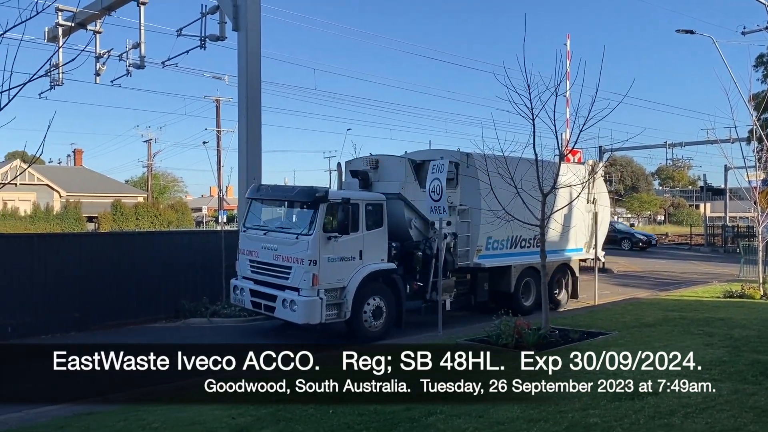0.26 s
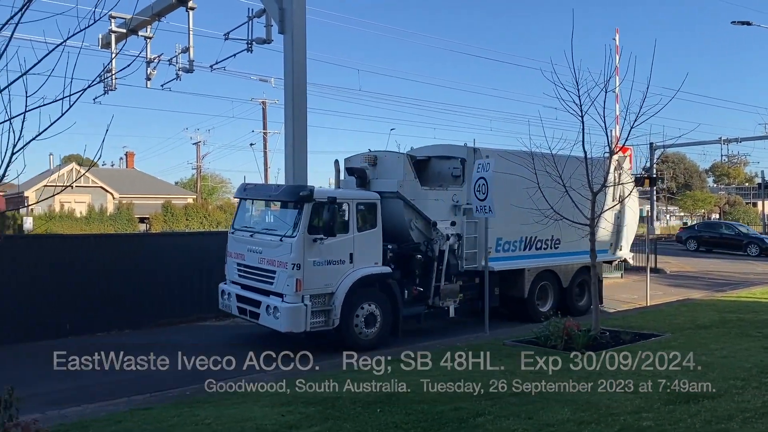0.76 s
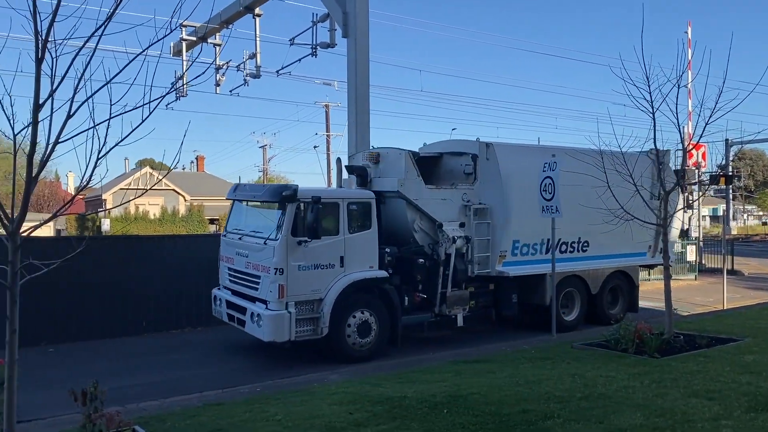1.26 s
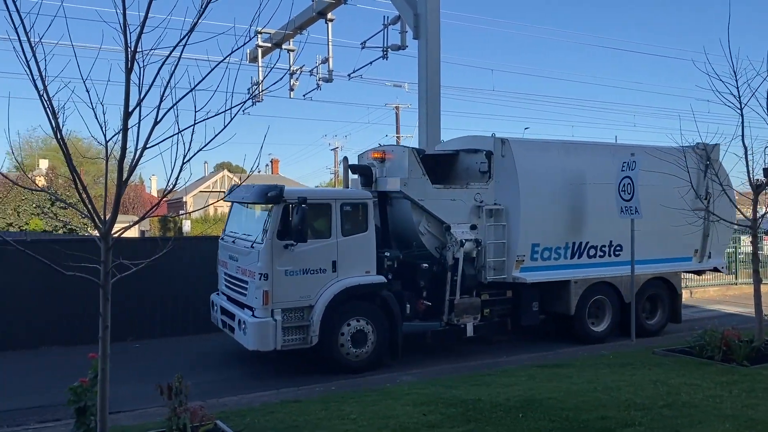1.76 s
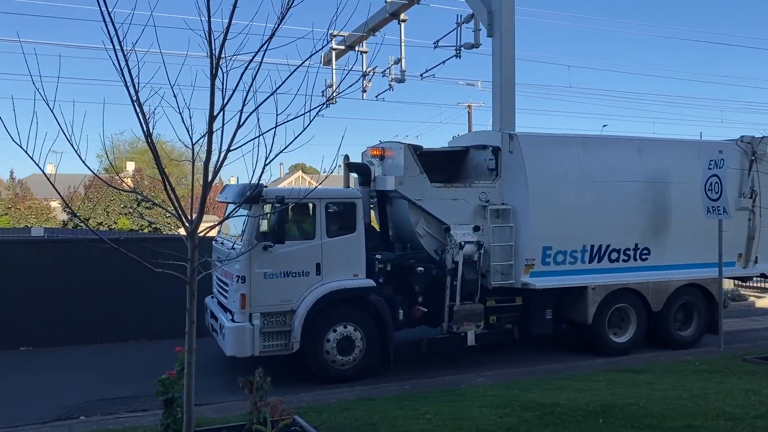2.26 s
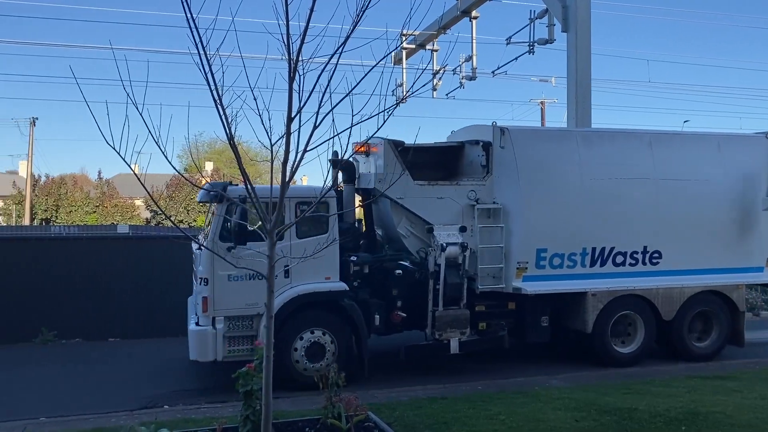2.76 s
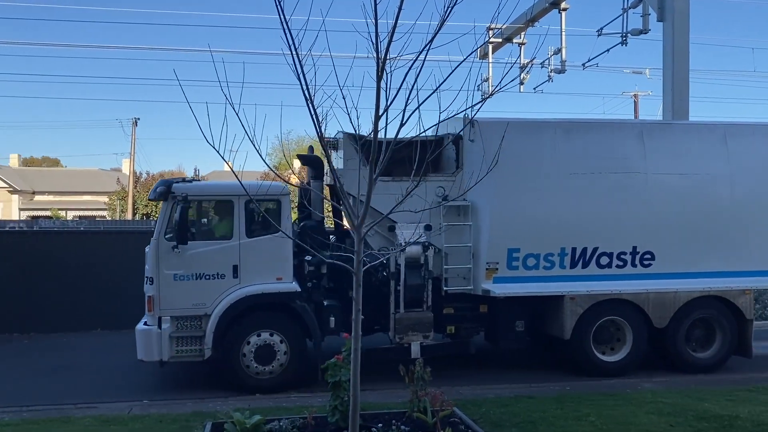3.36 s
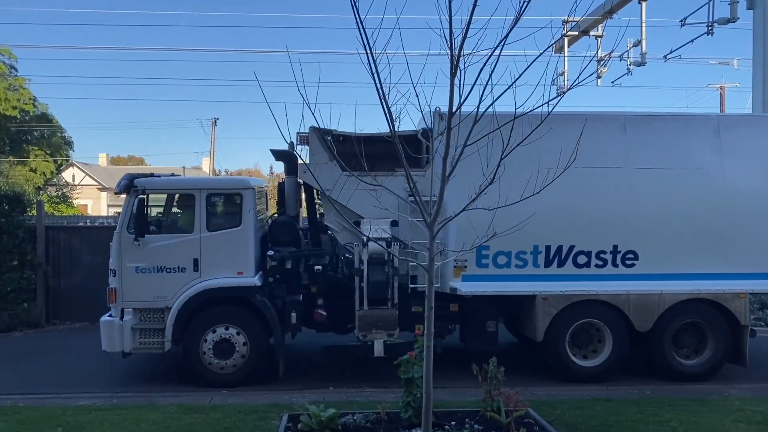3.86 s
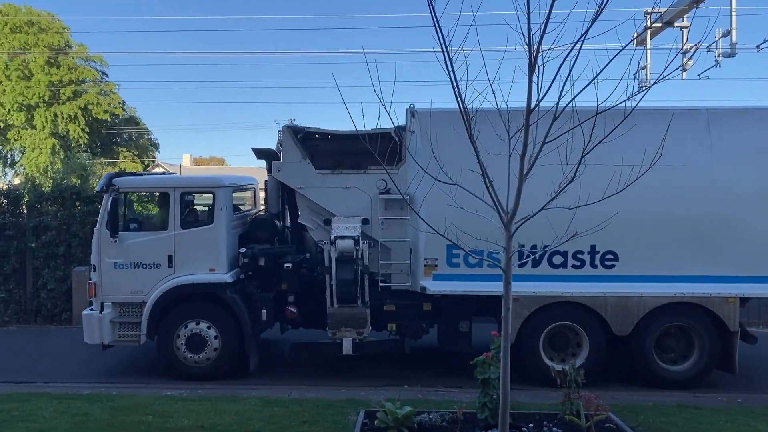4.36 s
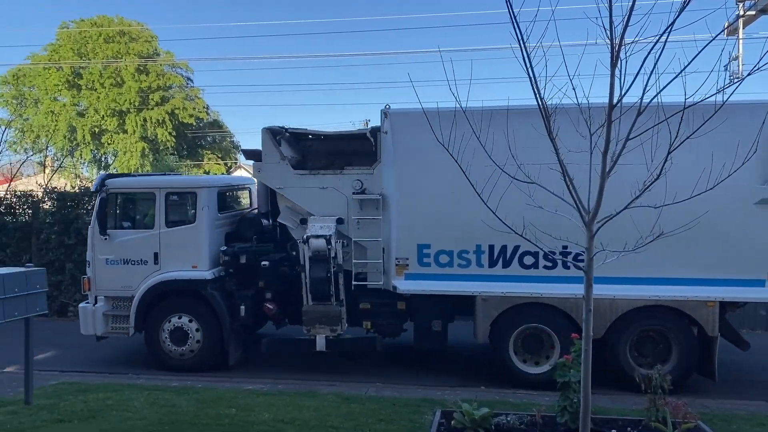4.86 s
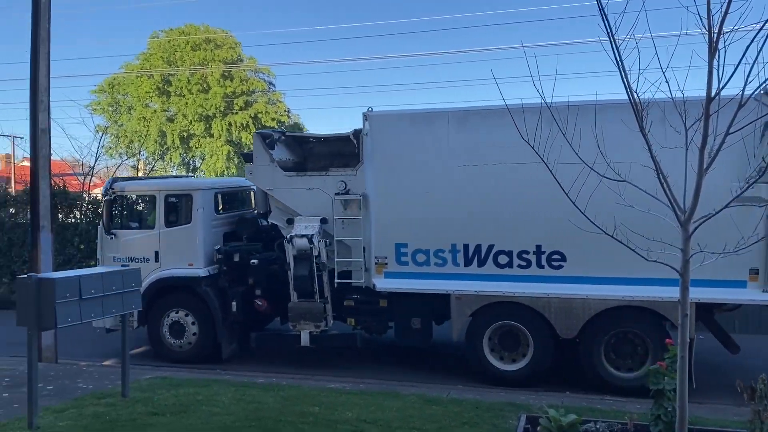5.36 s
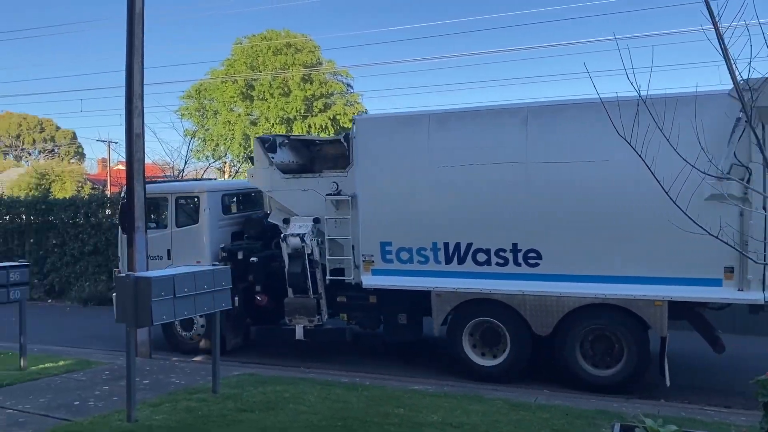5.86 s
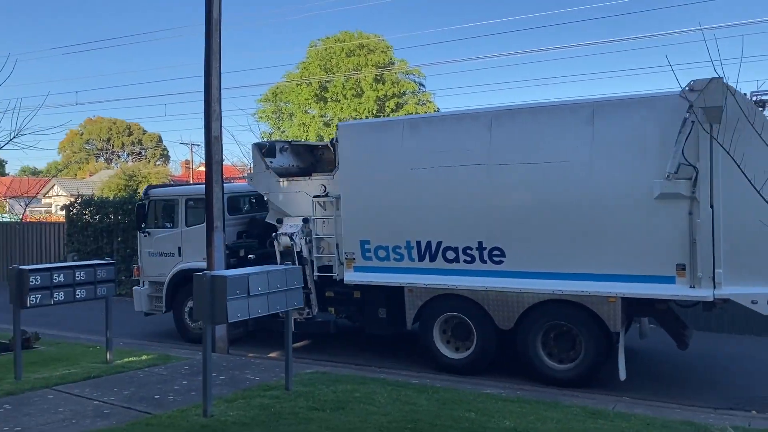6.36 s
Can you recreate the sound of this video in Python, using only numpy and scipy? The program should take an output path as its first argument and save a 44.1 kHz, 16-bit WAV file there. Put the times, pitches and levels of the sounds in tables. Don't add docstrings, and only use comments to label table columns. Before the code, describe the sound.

A heavy diesel refuse truck drives past close by, its deep exhaust drone sagging through two gear shifts, with valve clatter, turbo whistle and air hisses.

```python
import sys
import numpy as np
from scipy import signal
from scipy.fft import rfft, irfft, next_fast_len
from scipy.io import wavfile
from scipy.ndimage import uniform_filter1d, map_coordinates

SR = 44100
rng = np.random.default_rng(int(sys.argv[2]) if len(sys.argv) > 2 else 0)


def ratio(d):
    e = np.asarray(d, float) / 20
    return 10 ** e


def wav_out(sig):
    wavfile.write(sys.argv[1], SR, np.round(np.clip(np.atleast_2d(sig).T, -1, 1) * 32767).astype(np.int16))


N = 291501


def unit(x):
    return x / np.sqrt(np.mean(x ** 2) + 1e-20)


def along(points, hz, column=1):
    table = np.transpose(points)
    return np.interp(np.log(hz + 1), np.log(table[0] + 1), table[column])


def curve(rows):
    time_s, value = np.transpose(rows)
    return np.interp(np.arange(N) / SR, time_s, value)


def passing(start, end):
    return np.linspace(start, end, N)


def pan(left_right_db):
    return ratio(np.outer([.5, -.5], left_right_db))


def wobble(rate):
    coarse = np.arange(0, N + 32, 32)
    knots = rng.standard_normal(int(N * rate / SR) + 4)
    return np.interp(np.arange(N), coarse, map_coordinates(knots, [coarse * rate / SR]))


def filtered(x, response):
    m = next_fast_len(N + SR // 4)
    return irfft(rfft(x, m) * response(np.fft.rfftfreq(m, 1 / SR)), m)[..., :N]


# pitch_hz, likeness (0 to 1), left_lead_rad, left_right_db
PORTS = [(40, 0.79, 0, .3), (130, 0.83, 0.2, -2), (290, 0.88, 0.17, -1), (640, 0.52, 0.27, -0.5),
         (1480, 0.66, 0.78, -2), (2740, 0.65, 1.06, 2.5), (4640, 0.52, -0.8, 3), (5500, 0.4, -1.5, 0),
         (6500, 0.52, -0.3, 3.5), (7400, 0.89, -0.8, 3.5), (8440, 0.65, -2.5, -1), (9640, 0.61, -3, 1),
         (10500, 0.36, -5, 0.5), (16000, 0.14, -4, .3)]


def lead(hz):
    phase = np.outer([.5j, -.5j], along(PORTS, hz, column=2))
    return pan(along(PORTS, hz, column=3)) * np.exp(phase)


def rush(gain, patchy_db, strand_db=0):
    z = signal.stft(rng.standard_normal((2, N)), nperseg=2048, noverlap=1536)[2]

    def smooth(bins, frames):
        field = uniform_filter1d(rng.standard_normal(z.shape[1:]), bins, axis=0)
        return unit(uniform_filter1d(field, frames, axis=1))

    def spread(hz):
        turn = np.arccos(np.clip(along(PORTS, hz), 0, 1)) / 2
        return gain(hz) * np.array([np.cos(turn), np.sin(turn)])

    field_db = patchy_db * smooth(20, 7) + strand_db * np.clip(smooth(2, 22), 0, None) ** 2
    field_db = np.minimum(field_db, 7)
    pair = signal.istft(z * ratio(field_db), nperseg=2048, noverlap=1536)[1][:, :N]
    mid, side = filtered(pair, spread)
    return unit(filtered(np.array([mid + side, mid - side]), lead))


def tone(turns, db, flutter_db, smear, lag=0, jitter_rate=14):
    apart = smear * 0.66 * wobble(4.6) - lag / 2
    phase = 2 * np.pi * (turns + rng.random() + smear * wobble(jitter_rate) + np.outer([1, -1], apart))
    return np.sqrt(2) * ratio(db + flutter_db * wobble(jitter_rate)) * np.sin(phase)


CRUISE_HZ, CRUISE_DB = 64, -17

# time_s, firing_hz
SPEED = [(0, 64.65), (.18, 70.2), (.84, 69.8), (.98, 63.96), (1.12, 51.14), (1.26, 48.5), (1.54, 54.34),
         (1.82, 64.34), (1.96, 66.18), (2.24, 64), (2.8, 65.93), (3.22, 64.33), (3.68, 55.55), (4.4, 62.42),
         (4.97, 59.47), (6.02, 65.8), (6.3, 64.5), (6.61, 67.2)]


def firing_rate():
    return curve(SPEED)


REST_DB = dict(second=-40, third=-46, fourth=-48, fifth=-50, gear=-52.5)
# start_s, peak_s, end_s, rise_db
BOOMS = dict( second=[(-0.98, 0.8, 0.97, 19.5), (0.9, 1.44, 2.4, 8), (2.05, 2.95, 3.33, 18),
         (3.95, 4.7, 4.89, 8), (4.95, 5.9, 6.7, 12)], third=[(-.1, .14, 0.21, 14), (1.3, 2.4, 3.44, 15.5),
         (3.2, 3.85, 4.38, 12.5), (4.4, 5, 5.5, 7), (5.75, 6.1, 6.3, 9)], fourth=[(-.3, .02, 0.69, 14),
         (2.7, 3.1, 3.32, 8), (3.5, 4.6, 4.905, 11), (5.3, 6.0, 6.28, 15)], fifth=[(.01, .52, 0.82, 13),
         (1.8, 2.2, 3, 4), (3.7, 4.1, 4.6, 13.5), (4.7, 5.1, 5.49, 11), (5.65, 5.95, 13, 20)],
         gear=[(-.3, .52, 0.72, 10), (1.7, 1.95, 2.54, 15.5), (2.35, 2.85, 3.2, 23.5),
         (3.8, 6, 7.95, 12.5)])


def boom(name):
    t = np.arange(N) / SR
    level_db = REST_DB[name]
    for start, peak, end, rise_db in BOOMS[name]:
        level_db = level_db + rise_db * np.interp(t, [start, peak, end], [0, 1, 0]) ** 0.55
    return level_db


# time_s, drone_db
EFFORT = [(0, -13), (.84, -12), (.98, -35.5), (1.3, -34), (1.54, -20), (1.8, -19), (1.96, -13.5),
          (2.1, -18.5), (2.85, -17), (3.22, -18.5), (3.27, -36), (3.89, -25.5), (3.97, -16.5), (5.2, -20.5),
          (5.46, -18.5), (6.1, -16.5), (6.35, -22.5), (6.6, -11.5)]


def exhaust_drone(firings, drone_db):
    lag = passing(0.048, .002)
    drone_flutter_db = np.interp(drone_db, [-30, -20, -12], [3, 1.2, .3])
    out = tone(firings, drone_db, flutter_db=drone_flutter_db, smear=.005, lag=lag)
    for order, db in [(2, boom("second")), (3, boom("third"))]:
        flutter_db = np.interp(db, [-40, -28], [4, 1.2])
        out += tone(order * firings, db, flutter_db=flutter_db, smear=.025, lag=lag)
    upper_db = -43.5 + 0.42 * (drone_db - CRUISE_DB)
    for order, db in [(4, boom("fourth")), (5, boom("fifth")), (6, upper_db), (9, upper_db - 1.5)]:
        out += tone(order * firings, db, flutter_db=2.0, smear=0.094)
    return out


# multiple_of_firing, level_db (added to a base that rises with the drone)
UNEVEN = [(1 / 3, -44), (2 / 3, -28), (4 / 3, -36), (1.5, -27), (5 / 3, -31), (7 / 3, -25), (2.5, -22.5),
          (4.5, -26.5)]


def uneven_cylinders(firings, drone_db):
    base_db = 0.37 * (drone_db + 16.0) - 18.5
    return sum(tone(order * firings, base_db + db, flutter_db=3, smear=0.095) for order, db in UNEVEN)


def timing_gear(firings):
    return tone(68 / 3 * firings, boom("gear"), flutter_db=2, smear=.07, jitter_rate=30)


# time_s, blade_hz
TURBO = [(0, 7500), (.25, 8300), (.36, 8560), (.56, 8700), (.78, 9000), (1.1, 8050), (1.35, 7350),
         (1.55, 7000), (2.4, 7380), (3.0, 7280), (3.75, 6700), (4.2, 6550), (5.0, 6400), (5.5, 6550),
         (6.61, 7300)]


def turbocharger():
    blade_hz = curve(TURBO)
    over_khz = np.clip(blade_hz / 1000 - 7.6, 0, .5)
    blades = np.cumsum(blade_hz + 45 * wobble(150)) / SR
    return tone(blades, -52 - 5 * over_khz, flutter_db=2, smear=.1, jitter_rate=50)


# time_s, level_db
LABOUR = [(0.0, -26), (0.74, -26.5), (1.2, -34), (1.29, -30.5), (1.84, -26), (2.98, -26), (3.52, -29),
          (4.16, -25.5), (4.82, -27.5), (6.17, -26.5), (6.26, -29), (6.33, -26.5), (6.39, -28),
          (6.61, -27.5)]


def working(mean_db, per_labour_db, db_per_hz, gained_db, swing_db):
    labour_db = curve(LABOUR)
    level_db = mean_db + per_labour_db * (labour_db - labour_db.mean())
    level_db = level_db + db_per_hz * (firing_rate() - CRUISE_HZ)
    return level_db + passing(0, gained_db) + swing_db * wobble(7)


# centre_hz, width_hz, level_db (over the noise)
PANELS = [(353.4, 36, 8.5), (616, 51, 1.5), (690, 96, 1.5), (837, 50, 3.5), (909, 24, 5.5), (1012, 89, 1.5),
          (2250, 80, 0.5), (3500, 40, 4.5), (4090, 46, 4.5), (4620, 27, 6.5), (5460, 60, 5.5),
          (6750, 120, 3)]


def panel_noise(spectrum, **patches):
    def gain(hz):
        ring_db = sum(db / (1 + (2 * (hz - centre) / width) ** 2) for centre, width, db in PANELS)
        return ratio(along(spectrum, hz)) * ratio(ring_db)
    return rush(gain, **patches)


# pitch_hz, level_db (per Hz)
RUMBLE = [(130, -38), (200, 1.5), (240, 1), (350, -1), (430, -5.5), (560, -13.5), (900, -57)]


def rumble():
    level_db = working(-35, 0.85, 0.09, gained_db=4, swing_db=1.5)
    return ratio(level_db) * panel_noise(RUMBLE, patchy_db=0.26, strand_db=-0.3)


# pitch_hz, level_db (per Hz)
CHASSIS = [(12, -30), (25, -12), (40, -6), (55, 0), (85, -3), (110, -2.5), (160, -3.5), (200, -8),
           (280, -44)]


def road_and_chassis():
    level_db = working(-34, 0.4, -0.23, gained_db=1.5, swing_db=1)
    return ratio(level_db) * panel_noise(CHASSIS, patchy_db=2.0)


# pitch_hz, level_db (per Hz)
BLOCK = [(300, -43), (430, -9), (600, -3.5), (900, -2.5), (1500, -3.5), (2000, -5.5), (2600, -8.5),
         (2900, -21.5), (4000, -50)]


def block_roar(knock, tick, depth_db):
    level_db = working(-26, 0.82, 0.02, gained_db=-0.26, swing_db=0.47)
    noise = panel_noise(BLOCK, patchy_db=0.85, strand_db=2.06)
    roar = ratio(level_db) * unit(ratio(0.48 * knock + 0.21 * depth_db * tick) * noise)
    edge = filtered(roar, lambda hz: 1 / (1 + (1950 / (hz + 1)) ** 8))
    return roar + (ratio(passing(1.2, -2.5)) - 1) * edge


# pitch_hz, level_db (per Hz)
VALVES = [(1500, -43), (2600, -1), (3000, -0.5), (4500, -2), (6500, -4.5), (7800, -9), (8800, -15.5),
          (10500, -45)]


def valve_clatter(knock, beat):
    level_db = working(-34, 0.56, 0.1341, gained_db=-1, swing_db=0.58)
    noise = panel_noise(VALVES, patchy_db=0.5, strand_db=1.16)
    return ratio(level_db) * beat * unit(ratio(0.48 * knock) * noise)


# pitch_hz, level_db (per Hz)
FIZZ = [(7000, -52), (8600, -0.5), (10500, 2.5), (12000, -2.5), (13500, -3.5), (15600, -3.5), (15800, -60)]


def fizz(knock, beat):
    level_db = working(-45.5, 1, 0.13, gained_db=-0.9, swing_db=1.25)
    return ratio(level_db) * beat * unit(ratio(.6 * knock) * panel_noise(FIZZ, patchy_db=1.4))


def engine_noise(firings):
    knock = np.cos(2 * np.pi * firings)
    crank = firings / 3 + 0.071
    tick = np.exp(1.8 * (np.cos(2 * np.pi * crank) - 1)) * (1 + .25 * wobble(20))
    depth_db = passing(1.2, 4.2)
    beat = ratio(depth_db * (tick - tick.mean()))
    out = rumble() + road_and_chassis() + block_roar(knock, tick, depth_db)
    return out + valve_clatter(knock, beat) + fizz(knock, beat)


# multiple_of_firing, start_s, end_s, level_db
STRANDS = [(13.5, 2.5, 3.5, -37.5), (8.5, 2.5, 3, -40), (14, 4, 4.5, -33.5), (15, 4, 4.5, -37.5),
           (79 / 3, 2.65, 3.38, -37.5), (79 / 3, 4.3, 4.59, -40.5), (11, 5, 7.5, -41), (7.5, 0.1, 0.5, -45),
           (62 / 3, 0.11, 1, -40.5), (79 / 3, .2, .55, -48), (22 / 3, 1.06, 2.4, -44.5),
           (79 / 3, 5.4, 6.59, -44), (4, 4, 5.5, -41), (36.5, 1, 3, -44.5), (16.5, 3.5, 4.5, -41),
           (36, 2.5, 3, -43), (31 / 3, 5.58, 6.6, -44)]


def load_whines(firings):
    t, out = np.arange(N) / SR, 0
    for order, start, end, db in STRANDS:
        swell = np.sin(np.pi * np.clip((t - start) / (end - start), 0, 1)) ** 0.46
        out = out + swell * tone(order * firings, db, flutter_db=3, smear=.1, jitter_rate=25)
    return out


# start_s, rise_s, t60_s, centre_hz, width_octaves, level_db
AIR = [
    (0.85, 0.14, 1.9, 5100, 0.17, -38.5),
    (3.08, .12, 2.5, 3800, 0.83, -41),
    (3.93, 0.045, 0.52, 4200, 1.22, -37.5),
    (2.58, 0.17, 3.18, 1710, .09, -37),
    (5.18, .12, 2.04, 3200, 0.0053, -44.5),
]


def air_let_off():
    t, out = np.arange(N) / SR, 0
    hiss = rush(np.ones_like, patchy_db=1.5)
    for start, rise, t60, centre_hz, width, db in AIR:
        u = np.clip(t - start, 0, None)
        puff = unit(filtered(hiss, lambda hz: np.exp(-(np.log2((hz + 1) / centre_hz) / width) ** 2)))
        out = out + ratio(db - 60 * u / t60) * (1 - np.exp(-(u / rise) ** 2)) * 2 * puff
    return out


# start_s, start_hz, end_hz, rise_s, t60_s, level_db (peak)
THUMP = [
    (5.34, 189.7, 110, 0.044, 0.12, -15),
]


def seam_thump():
    t, out = np.arange(N) / SR, 0
    for start, start_hz, end_hz, rise, t60, db in THUMP:
        u = np.clip(t - start, 0, None)
        pitch_hz = end_hz + (start_hz - end_hz) * np.exp(-(u / rise) ** 2)
        swell = np.clip(u / rise, 0, 1) * ratio(db - 60 * np.clip(u - rise, 0, None) / t60)
        out = out + swell * np.sin(2 * np.pi * np.cumsum(pitch_hz * (u > 0)) / SR)
    return out


def scene():
    firings = np.cumsum(firing_rate()) / SR
    drone_db = curve(EFFORT)
    tones = exhaust_drone(firings, drone_db) + uneven_cylinders(firings, drone_db)
    tones = tones + timing_gear(firings) + turbocharger()
    body = engine_noise(firings) + load_whines(firings) + air_let_off() + seam_thump()
    return tones * pan(passing(-1.7, .4)) + body * pan(passing(-1.3, -.6))


def roll_off(x):
    return signal.sosfilt(signal.butter(12, 16880, fs=SR, output="sos"), x)


# low_hz, high_hz, level_db
SUM_GAPS = [(8380, 8800, -7), (8750, 9450, -30), (9450, 9650, -7), (12400, 12750, -8), (12750, 13800, -40),
            (13800, 14250, -5), (15750, 23000, -80)]
# low_hz, high_hz, level_db
DIFFERENCE_GAPS = [(6500, 6900, -3), (6900, 7550, -6), (10400, 10700, -7), (10700, 11700, -30),
                   (11700, 12050, -7), (14450, 14800, -9), (14800, 23000, -80)]


def record(dry):
    def gaps(bands, hz):
        return ratio(sum(db * ((hz > low) & (hz < high)) for low, high, db in bands))

    pair = np.array([dry[0] + dry[1], dry[0] - dry[1]]) / 2
    mid, side = filtered(pair, lambda hz: np.array([gaps(SUM_GAPS, hz), gaps(DIFFERENCE_GAPS, hz)]))
    return roll_off(np.array([mid + side, mid - side]))


dry = scene()
out = record(dry)
wav_out(out)
```